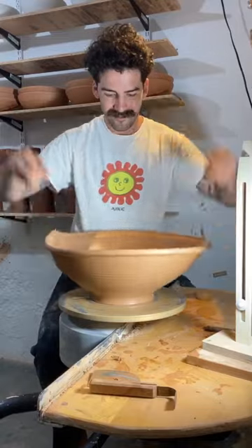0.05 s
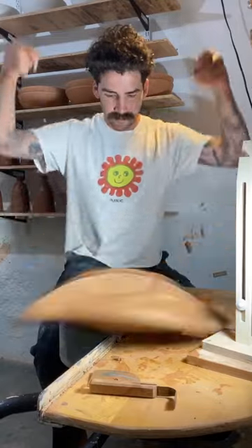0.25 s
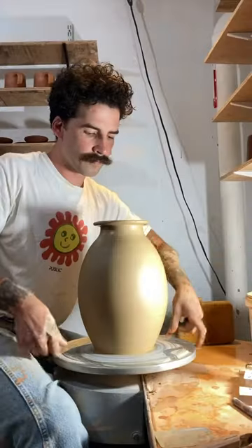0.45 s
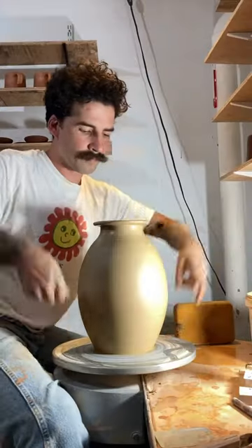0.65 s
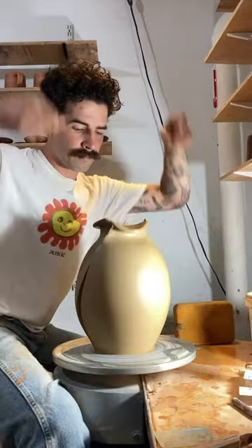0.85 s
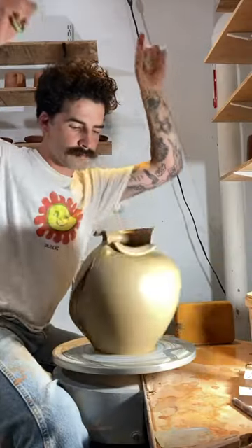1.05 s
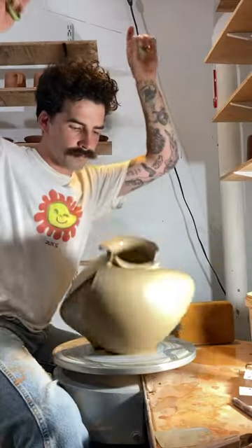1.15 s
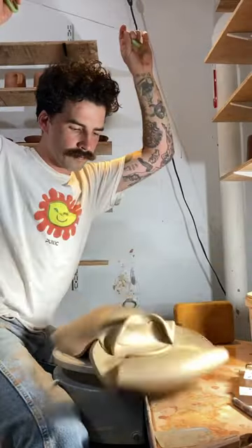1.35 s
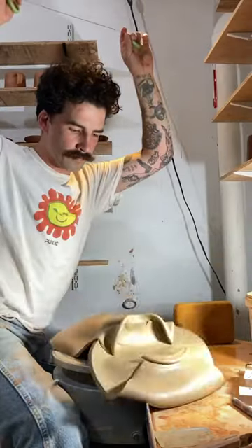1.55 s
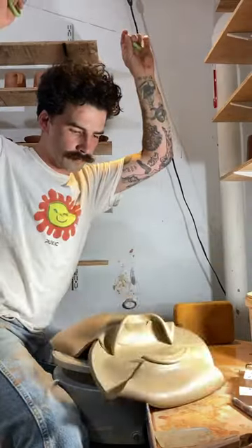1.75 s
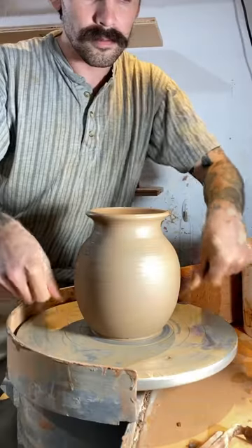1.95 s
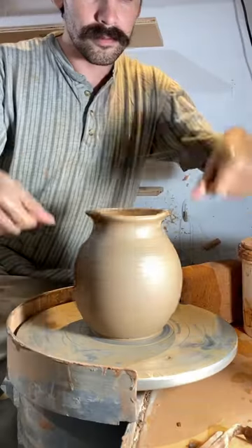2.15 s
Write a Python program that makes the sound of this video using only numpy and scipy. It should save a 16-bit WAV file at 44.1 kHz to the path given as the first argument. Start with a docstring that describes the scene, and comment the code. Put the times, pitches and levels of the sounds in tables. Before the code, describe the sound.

A wet clay bowl flops down with two quick slaps, hollow pops and a low thud at about 0.2 to 0.3 seconds. At 0.6 a wire plucks free of a vase, which rings briefly. Faint rubbing and hiss lead to a wet smack at 1.3 as the vase collapses. From 1.8 a potter's wheel rumbles softly, with a short clay rub at 2 seconds, in a small studio.

```python
"""Wet clay pots, slit with a wire, collapse on a potter's wheel in a small studio, in three scenes.
A bowl flops down in two slaps; a wire plucks free of a hollow vase, which sags and slaps down; then
the wheel rumbles under a third pot. Each fall squeezes out pockets of air with short pops, sprays
fine wet crackle and excites low modes of wheel and room. Sliding clay hisses and rubs in between."""
import sys
import numpy as np
from scipy import signal
from scipy.fft import rfft, irfft, next_fast_len
from scipy.io import wavfile
from scipy.ndimage import uniform_filter1d, map_coordinates

SR = 44100
rng = np.random.default_rng(int(sys.argv[2]) if len(sys.argv) > 2 else 0)


def persist_wave(psi):
    """Save psi, clipped to +-1, as 16-bit WAV."""
    counts = np.round(np.clip(psi, -1, 1) * 32767).astype(np.int16)
    wavfile.write(sys.argv[1], SR, np.atleast_2d(counts).T)


N = 97020

def amp(db):
    """Decibels to amplitude ratio."""
    return 10 ** (np.asarray(db) / 20)

def unit(x):
    """Normalisation to rms 1."""
    return x / np.sqrt(np.mean(x ** 2) + 1e-20)

def along(points, hz):
    """Interpolation of (Hz, value) points on a logarithmic frequency axis."""
    freqs, values = np.transpose(points)
    return np.interp(np.log(hz + 1), np.log(freqs + 1), values)

def since(start):
    """Seconds elapsed after start, zero before."""
    return np.maximum(np.arange(N) / SR - start, 0)

def filtered(x, response):
    """Linear filtering: the spectrum of x times a frequency response."""
    size = next_fast_len(N + 8192)
    return irfft(rfft(x, size) * response(np.fft.rfftfreq(size, 1 / SR)), size)[..., :N]

def noise(spectrum):
    """Coloured Gaussian noise of rms 1."""
    return unit(filtered(rng.standard_normal(N), lambda hz: amp(along(spectrum, hz))))

def decay(start, rise, t60):
    """Exponential damping: an envelope that rises, then loses 60 dB every t60 seconds."""
    t = since(start)
    return (1 - np.exp(-t / rise)) * np.exp(-np.log(1000) * t / t60)

def swell(centre, half_width):
    """Gaussian envelope, down to 1/e at half_width seconds from its centre."""
    return np.exp(-((np.arange(N) / SR - centre) / half_width) ** 2)

def wobble(rate):
    """Smooth random modulation with rate knots a second."""
    return map_coordinates(rng.standard_normal(N // 100), [np.arange(N) * rate / SR], mode="wrap")

# Each row: frequency in Hz, correlation of left and right in the room.
COHERENCE = [(160, .88), (300, 0.5), (600, 0.18), (1000, -.35), (2500, .05)]
def mid_side_gains(hz):
    """Coherence: the balance of mid and side power sets the left-right correlation."""
    angle = np.arccos(along(COHERENCE, hz)) / 2
    return np.array([np.cos(angle), np.sin(angle)])

def diffuse(spectrum):
    """Diffuse field: stereo noise of rms 1, coherent in the bass and unrelated in the treble."""
    white = rng.standard_normal((2, N))
    mid, side = filtered(white, lambda hz: amp(along(spectrum, hz)) * mid_side_gains(hz))
    return unit(np.array([mid + side, mid - side]))

def whiten(tail):
    """Whitening: division by the smoothed magnitude spectrum, so no broad band is favoured."""
    spectrum = rfft(tail, 2 * tail.shape[1])
    power = np.abs(uniform_filter1d(np.abs(spectrum) ** 2, size=120, axis=1))
    return irfft(spectrum / np.sqrt(power + 1e-20))[:, :tail.shape[1]]

# The room around the bowl and around the vase. Each row: frequency in Hz, t60 in seconds.
BOWL_ROOM = [(400, .5), (1000, .38), (3000, .42), (12000, .27)]
VASE_ROOM = [(300, .6), (530, .45), (2500, .52), (16000, .36)]
def reverberate(x, room_db, room, build_up_s=0.006):
    """Reverberation: direct sound plus a diffuse tail, each frequency dying at its own rate."""
    hz, t, bands = signal.stft(rng.standard_normal((2, SR * 2 // 3)), SR, nperseg=256)
    age = t / along(room, hz)[:, None]
    damping = np.exp(-np.log(1000) * age - (age / 0.53) ** 6)  # steepens near half the t60
    mid, side = signal.istft(bands * mid_side_gains(hz)[..., None] * damping, SR, nperseg=256)[1]
    onset = 1 - np.exp(-(np.arange(len(mid)) / SR / build_up_s) ** 2)
    tail = whiten(np.array([mid + side, mid - side])) * onset
    tail /= np.linalg.norm(tail[0])
    return x + amp(room_db) * signal.fftconvolve(x[None], tail, axes=1)[:, :N]

# Spectrum of the still room. Each row: frequency in Hz, relative level in dB.
AIR_SPECTRUM = [(25, -17.5), (60, 2.5), (120, -9), (900, -21), (2000, -34), (3100, -22), (4500, -33.5),
                (16000, -45)]
def room_tone(air_db=-69, hum_db=-67.5, hum_hz=57.3):
    """Ambient noise: a diffuse field in still air, with a low pure-tone hum."""
    return amp(air_db) * diffuse(AIR_SPECTRUM) + amp(hum_db) * np.sin(2 * np.pi * hum_hz * since(0))

# Course of the hiss. Each row: time in seconds, level in dB.
HISS_LEVELS = [(0, -81), (0.108, -62.5), (.21, -62.5), (.45, -83.5), (0.53, -59.5), (.71, -79.5),
               (.765, -71), (0.9, -78), (1.21, -60.5), (1.319, -70.5), (1.55, -93), (1.779, -84),
               (1.8, -67.5), (1.872, -77.5), (1.95, -63), (2.07, -79.5), (2.158, -70)]
# Its spectrum. Each row: frequency in Hz, relative level in dB.
HISS_SPECTRUM = [(800, -14), (2000, -0.5), (5500, -3), (7500, 4), (15500, 6)]
def wet_hiss():
    """Friction noise: wet clay fizzes as it slides and peels."""
    times, db = np.transpose(HISS_LEVELS)
    return amp(np.interp(np.arange(N) / SR, times, db)) * diffuse(HISS_SPECTRUM)

# Each row: centre of a rub in seconds, half-width in seconds, level in dB, pitch ratio.
RUBS = [(0.01, 0.029, -65.5, 1), (0.816, 0.062, -61, 0.82), (0.845, 0.04, -65, 1.42),
        (2.027, 0.041, -44.5, 1.026)]
# Rub spectrum. Each row: frequency in Hz at pitch ratio 1, relative level in dB.
RUB_SPECTRUM = [(100, -39), (230, -6), (320, 3), (420, -14.5), (8000, -57)]
def rubs():
    """Sliding friction: clay on the wheel head gives hollow swells of narrow-band noise."""
    return sum(diffuse([(hz * pitch, level) for hz, level in RUB_SPECTRUM])
               * amp(db) * swell(centre, half_width) for centre, half_width, db, pitch in RUBS)

# Slaps and small wet smacks; at 0.403 s a dying echo opens the vase scene, at 0.497 s the wire ticks
# taut. Each row: start in seconds, levels of thud, smack, spray and crack in dB, room gain in dB.
TRANSIENTS = [(0.2223, -67, -45.5, -66, -43, 9), (0.2348, -30, -30.5, -45.5, -21.5, -0.5),
              (0.2975, -58, -29, -51, -32.5, -2.5), (0.303, -26.5, -32.5, -51, -59, 3.5),
              (0.403, -56.5, -55, -76, -79, 8), (0.497, -89, -62.5, -55, -52, 5.5),
              (1.3333, -74.5, -30.5, -38.5, -33, 2.5), (1.3433, -63, -30, -46.5, -32.5, 0),
              (1.412, -43.5, -48.5, -59, -58, 2)]
# Spectra of their parts. Each row: frequency in Hz, relative level in dB.
THUD_SPECTRUM = [(30, -26.5), (70, -9), (130, 2), (220, -1), (450, 4), (700, -1), (1200, -39),
                 (4000, -71.5)]
SMACK_SPECTRUM = [(100, -37), (350, -13), (650, -1.5), (1100, -6.5), (2100, -16), (6000, -25), (16000, -50)]
SPRAY_SPECTRUM = [(500, -23.5), (2000, -2), (4000, -21.5), (6000, -12), (8000, 8), (11000, 9), (15500, 1.5)]
def transient(start, thud_db, smack_db, spray_db, crack_db, room_db, room):
    """Impulsive excitation: a broadband burst of crack, thud, smack and tiny wet clicks."""
    crack = amp(crack_db) * noise(SPRAY_SPECTRUM) * decay(start, rise=0.0001, t60=0.014)
    thud = amp(thud_db) * noise(THUD_SPECTRUM) * decay(start, rise=0.0016, t60=0.2)
    smack = amp(smack_db) * noise(SMACK_SPECTRUM) * decay(start, rise=0.00078, t60=0.091)
    clicks = rng.standard_normal(N) * np.exp(0.2 * rng.standard_normal(N))  # slightly spiky noise
    crackle = unit(filtered(clicks, lambda hz: amp(along(SPRAY_SPECTRUM, hz))))
    spray = amp(spray_db) * crackle * decay(start, rise=0.000067, t60=0.02)
    return reverberate(crack + thud + smack + spray, room_db, room)

def damped_mode(start, hz, glide, db, rise, t60, settle_s=0.02, flutter_rad=0.3):
    """Damped oscillation: the pitch relaxes to hz while the soft walls make the phase flutter."""
    t = since(start)
    cycles = hz * (t + glide * settle_s * (1 - np.exp(-t / settle_s)))
    return amp(db) * decay(start, rise, t60) * np.sin(2 * np.pi * cycles + flutter_rad * wobble(120))

# Each row: start of a pop in seconds, final pitch in Hz, initial pitch offset as a fraction,
# level in dB, rise and t60 in seconds, room gain in dB.
AIR_POPS = [(0.2355, 893.5, 0.051, -25.5, 0.001, 0.083, 6.5), (0.236, 780, 0.056, -22, 0.0028, 0.14, -1.5),
            (0.262, 804, .05, -21, 0.004, 0.11, -3), (0.303, 355.8, .12, -5.5, 0.0047, 0.07, -4.5),
            (0.304, 308.8, 0, -21.5, 0.0045, 0.21, 1), (0.304, 488, 0.039, -20, 0.0047, 0.072, 3.5),
            (1.335, 523, 0.033, -18.5, 0.0012, 0.085, -3.5), (1.336, 1117, 0.06, -36.5, .002, 0.049, 8.5)]
def air_pop(start, hz, glide, db, rise, t60, room_db, room):
    """Cavity resonance: a pocket of air rings briefly as it is squeezed from under the clay."""
    return reverberate(damped_mode(start, hz, glide, db, rise, t60), room_db, room)

# Each row: start of a boom in seconds, frequency in Hz, level in dB, rise in seconds.
BOOMS = [(0.245, 157.8, -20, 0.03), (0.296, 60.2, -30.5, 0.022), (0.405, 514, -52.5, 0.0057),
         (1.36, 161.7, -35.5, 0.031), (1.345, 249.8, -29.5, 0.058), (1.35, 524, -35.5, .008),
         (1.44, 312, -45.5, .04)]
def boom(start, hz, db, rise):
    """Resonance: a low mode of wheel and room builds up and wavers as it dies."""
    phase = 2 * np.pi * hz * since(start) + 0.8 * wobble(30)
    return amp(db + 3 * wobble(35)) * decay(start, rise, t60=0.46) * np.sin(phase)

def collapse(start, end, room):
    """Superposition of the transients, pops and booms that begin between two times."""
    bursts = sum(transient(*row, room) for row in TRANSIENTS if start < row[0] < end)
    pops = sum(air_pop(*row, room) for row in AIR_POPS if start < row[0] < end)
    booms = sum(boom(*row) for row in BOOMS if start < row[0] < end)
    return bursts + pops + booms

# Each row: start of a tug of the wire in seconds, level in dB.
WIRE_PLUCKS = [(0.608, -30.5)]
# Each row: final pitch of a mode in Hz, initial pitch offset as a fraction, level in dB relative
# to the pluck, rise and t60 in seconds.
VASE_MODES = [(191.6, -0.0048, 3, 0.019, 0.16), (162.6, 0.085, 0, 0.019, 0.17),
              (824, 0.128, -9, 0.029, 0.21), (1142, 0.023, -12, 0.002, 0.075),
              (1403, -0.031, -19.5, 0.0033, 0.1)]
# Spectrum of the wire leaving the clay. Each row: frequency in Hz, relative level in dB.
SCUFF_SPECTRUM = [(300, 4), (600, -7), (900, 6.5), (1400, 4.5), (1700, -11), (9000, -32)]
def vase_pluck(scuff_gain_db=-16):
    """Free vibration: the wire scuffs out of the clay and leaves the hollow vase ringing."""
    modes = sum(damped_mode(start, hz, glide, db + mode_db, rise, t60)
                for start, db in WIRE_PLUCKS for hz, glide, mode_db, rise, t60 in VASE_MODES)
    scuff_envelope = sum(amp(db + scuff_gain_db) * decay(start, rise=0.0034, t60=0.22)
                         for start, db in WIRE_PLUCKS)
    return reverberate(modes + noise(SCUFF_SPECTRUM) * scuff_envelope, room_db=-4, room=VASE_ROOM)

# Each row: centre of a fold in seconds, level in dB, width in seconds.
FOLDS = [(0.965, -62, 0.012), (0.986, -63.5, 0.024), (1.306, -61.5, 0.034)]
# Fold spectrum. Each row: frequency in Hz, relative level in dB.
FOLD_SPECTRUM = [(60, -19), (190, -1.5), (480, -7.5), (1450, -13), (1800, -28.5), (16000, -65)]
def folds():
    """Plastic deformation: soft clay shifts and folds over with dull pats."""
    envelope = sum(amp(db) * swell(centre, width / 2) for centre, db, width in FOLDS)
    return reverberate(noise(FOLD_SPECTRUM) * envelope, room_db=7.5, room=VASE_ROOM)

# Spectrum of the wheel. Each row: frequency in Hz, relative level in dB.
WHEEL_SPECTRUM = [(20, -33), (49, -8.5), (108, 1.5), (192, -11), (349, -5), (540, -16), (1070, -18),
                  (3380, -37.5), (6000, -38), (13200, -110)]
def wheel(db=-51):
    """Machinery noise: the turning wheel radiates a steady low rumble."""
    return amp(db) * diffuse(WHEEL_SPECTRUM)

VASE_SCENE_S, WHEEL_SCENE_S = 0.402, 1.79
def scene():
    """Three scenes joined abruptly; the bowl's echo drops by 50 dB as the second begins."""
    vase_on, wheel_on = [np.minimum(since(s) / 0.00045, 1) for s in (VASE_SCENE_S, WHEEL_SCENE_S)]
    bowl = collapse(0, VASE_SCENE_S, BOWL_ROOM) * amp(-50 * vase_on)
    vase = vase_pluck() + folds() + collapse(VASE_SCENE_S, WHEEL_SCENE_S, VASE_ROOM)
    return (bowl + vase) * (1 - wheel_on) + wheel() * wheel_on + rubs() + wet_hiss() + room_tone()

# Treble nulls before, then during, the wheel scene. Each row: two centre frequencies in Hz.
NULLS_HZ = [(9100, 13800), (5500, 11700)]
def notched(x, centres, depth_db=-24, half_width_hz=520):
    """Band-stop filtering: a bell-shaped dip in level at each centre frequency."""
    dips = lambda hz: sum(np.exp(-((hz - centre) / half_width_hz) ** 2) for centre in centres)
    return filtered(x, lambda hz: amp(depth_db * dips(hz)))

def record(dry, left_lag_s=0.00003, top_hz=16200):
    """Microphone response: two treble nulls, a slightly late left side and a band limit."""
    before, during = [notched(dry, centres) for centres in NULLS_HZ]
    coloured = np.where(since(WHEEL_SCENE_S) > 0, during, before)
    lag = lambda hz: np.exp(1j * np.pi * hz * left_lag_s * np.array([[-1], [1]]))
    return filtered(coloured, lambda hz: lag(hz) * (hz < top_hz))

dry = scene()
out = record(dry)
persist_wave(out)
```